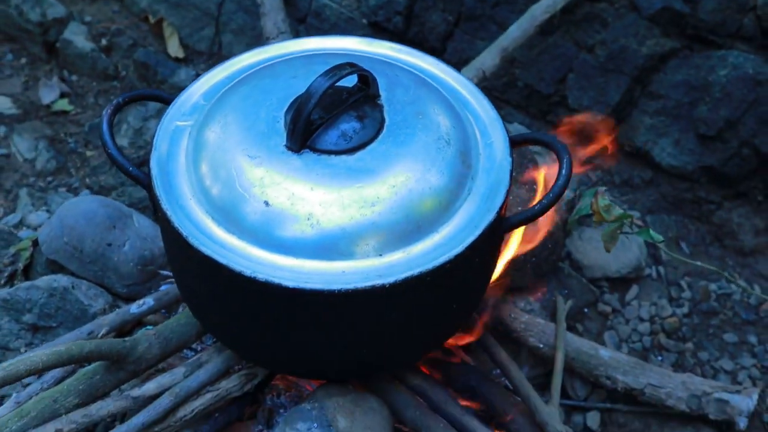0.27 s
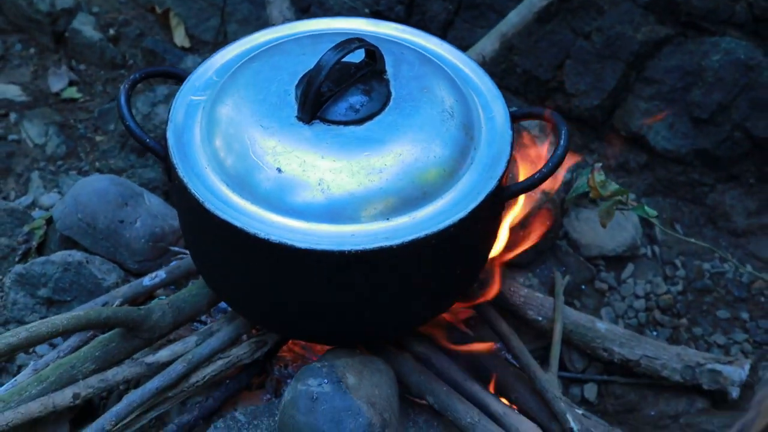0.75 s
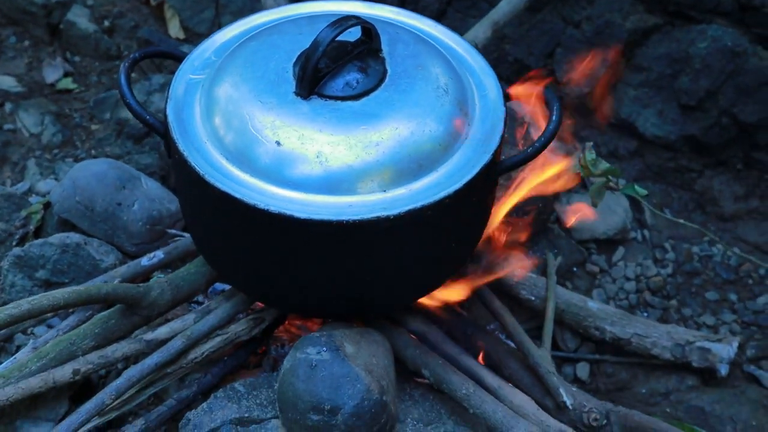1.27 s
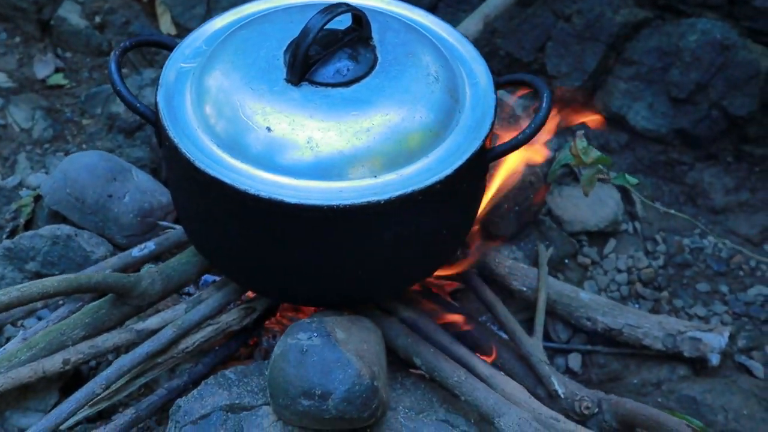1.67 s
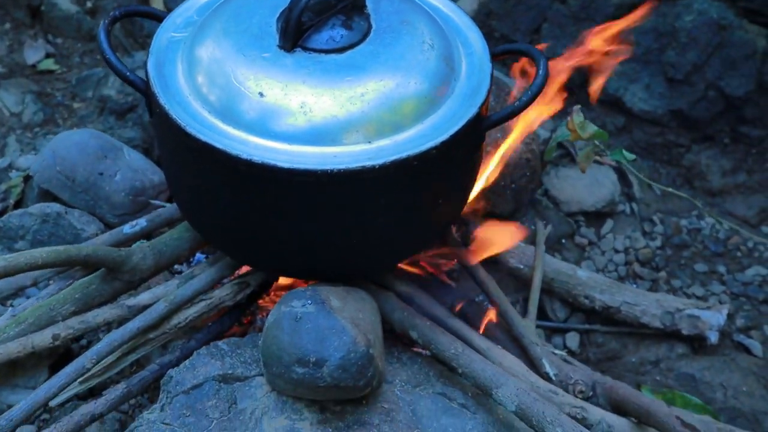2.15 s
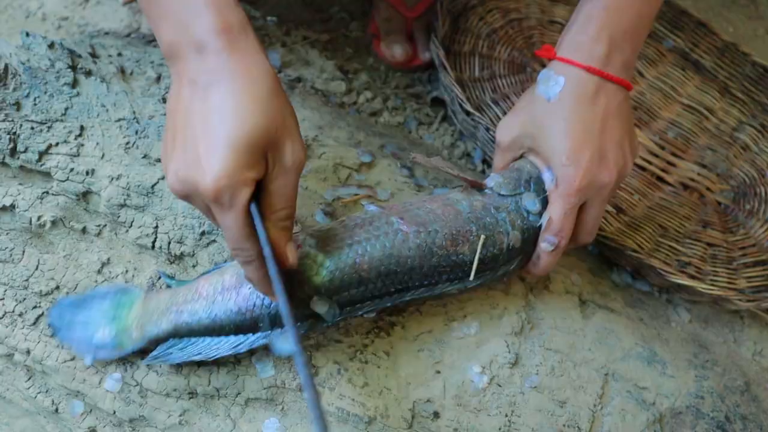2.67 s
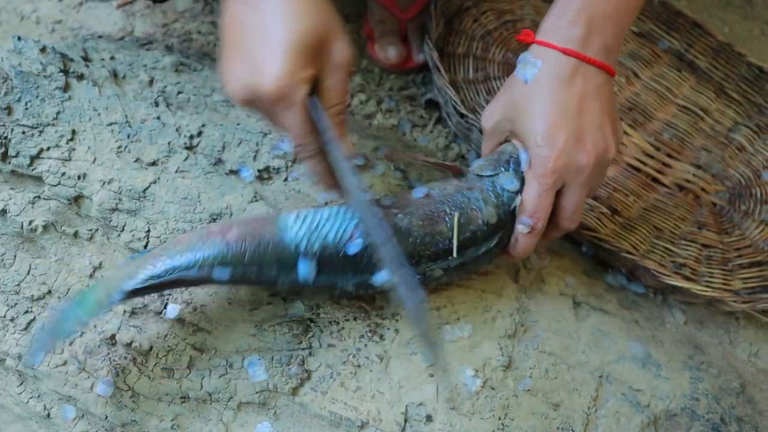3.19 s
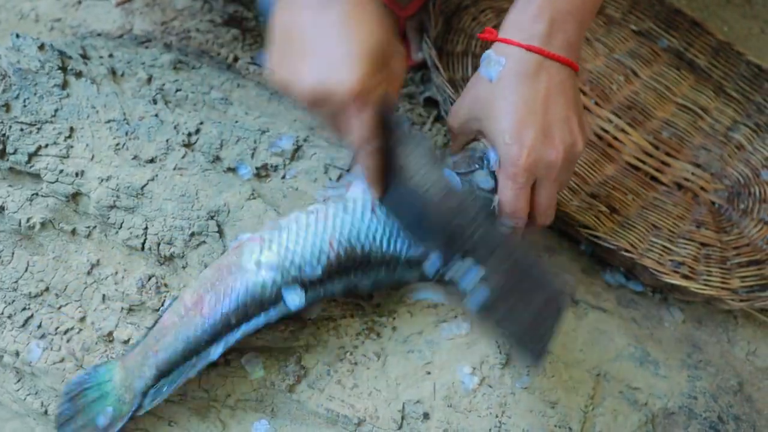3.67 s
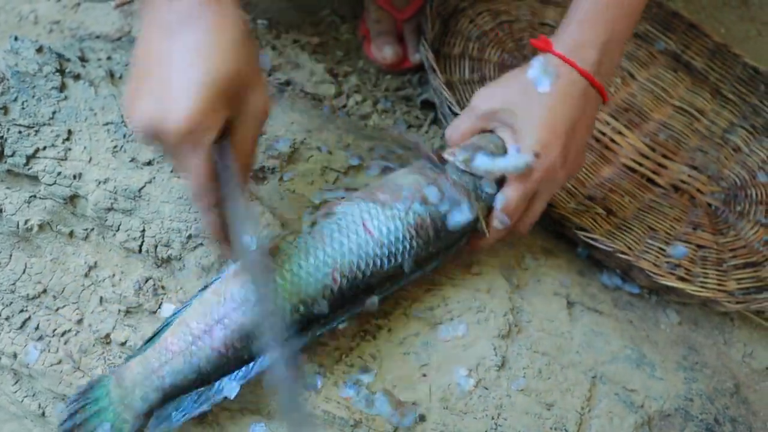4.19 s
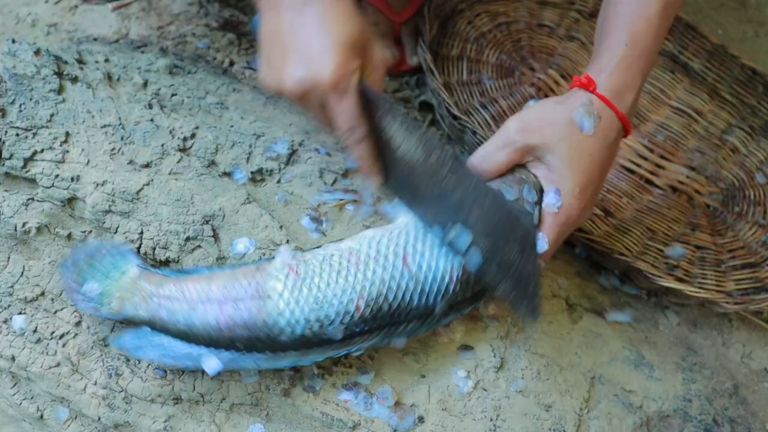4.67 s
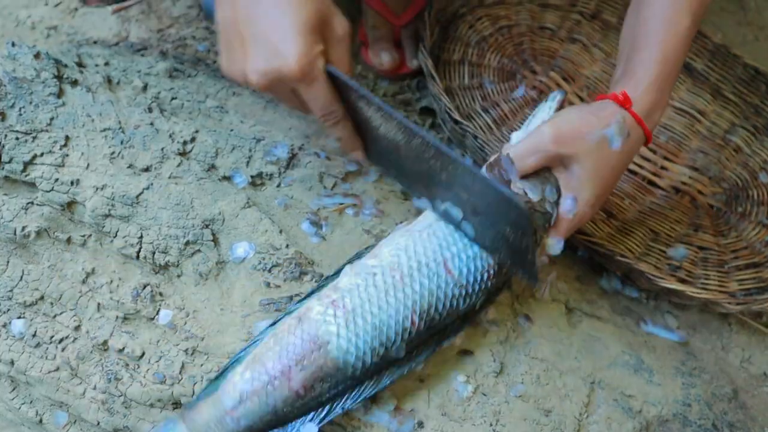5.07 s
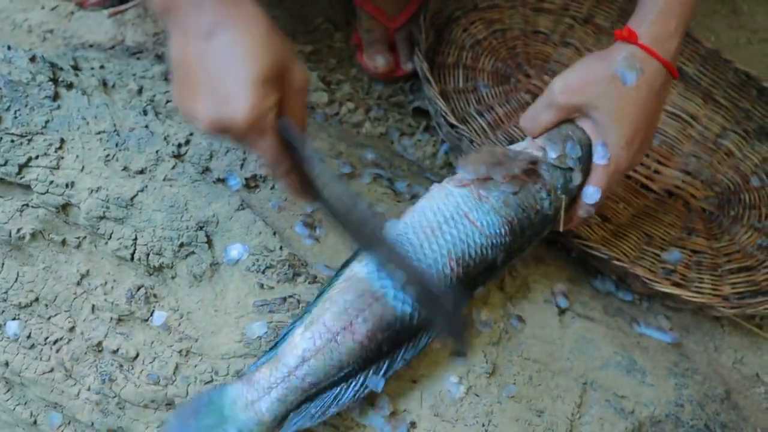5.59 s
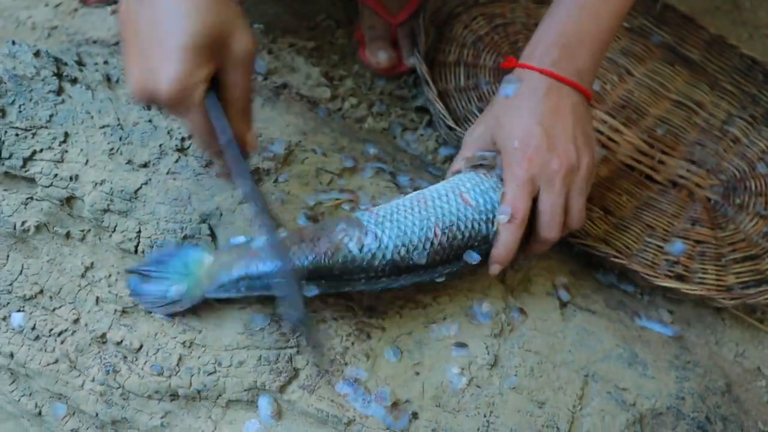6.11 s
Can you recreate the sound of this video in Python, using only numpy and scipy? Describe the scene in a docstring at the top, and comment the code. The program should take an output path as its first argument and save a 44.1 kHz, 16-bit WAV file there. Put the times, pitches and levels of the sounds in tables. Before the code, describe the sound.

First, flames flap and puff under a pot while wood hisses and crackles. After a hard cut and tiny gap, a cleaver scrapes a fish close to the microphone outdoors: short, bright, gritty rasps at an even pace, scales popping loose, wet skin brushing, the blade lightly pinging. The room-less sound is dry, with quiet air and, later, small distant trilling insect phrases.

```python
"""A wood fire flutters and hisses under a pot; after a short silence, a cleaver scales a fish on the ground outdoors.
The fire is coloured noise and grains with swelling levels, soft sinking thumps, and cracks and jets through resonances.
Each stroke is tearing grains, a drumming body, a skid and a trail; slides, snaps and strokes ring the steel's modes.
Behind, something small, probably an insect, chirps: a falling glide, then rising ticks, in a haze of band noise.
Two close microphone ports hear the fish with their own levels and phases, over quiet wavering air."""
import sys
import numpy as np
from scipy import signal
from scipy.fft import rfft, irfft, next_fast_len
from scipy.io import wavfile
from scipy.ndimage import uniform_filter1d, map_coordinates

SR = 44100
rng = np.random.default_rng(int(sys.argv[2]) if len(sys.argv) > 2 else 0)


def dump(signal):
    """Clip the signal to [-1, 1] and save it as 16-bit WAV at the path in sys.argv[1]."""
    limited = np.clip(np.atleast_2d(signal).T, -1, 1)
    pcm = np.round(limited * 32767).astype(np.int16)
    wavfile.write(sys.argv[1], SR, pcm)


N = 279594
T = np.arange(N) / SR

FIRE_END, FISH_START = 2.721, 2.759  # seconds
FLUTTER_S = .014  # spacing in time of the fire's changes of colour
TOUCH_S, LEAVE_S = 0.0035, 0.004  # time constants as a sliding contact sets in, and ends

# Width of the fire around the ports. Each row: frequency in Hz, side relative to middle in dB.
FIRE_WIDTH = [(60, -28), (110, -25), (200, -11), (380, -6.5), (700, -5.5), (1290, 1.5), (2380, 5.5),
              (4400, 7.5), (8120, 10), (15000, 3.5)]
# Strokes against the scales, each with one skid of the blade. Each row: start in seconds, length in seconds,
# bite time constant in seconds, relative tearing level in dB, fade over the stroke in dB, relative flesh level in dB,
# body resonance in Hz, skid start after the stroke's start in seconds, skid length in seconds,
# relative skid level in dB, squeak in Hz.
STROKES = [(2.836, 0.087, 0.0097, -15, 4, -31, 507, 0.06, 0.019, -15.5, 8100),
           (3.117, 0.1, 0.013, -24, -4.5, -33, 267, -0.0062, 0.039, -18, 6850),
           (3.424, 0.128, 0.01, -17.5, 7.5, -34.5, 264, -0.0053, 0.016, -13, 6250),
           (3.741, 0.083, 0.019, -23.5, -5, -36, 428, 0.057, 0.017, -20.5, 5100),
           (4.059, 0.099, 0.012, -23, -1, -34.5, 546, 0.054, 0.011, -43, 8900),
           (4.373, 0.13, 0.005, -21.5, 0, -35.5, 900, -0.00065, 0.011, -17, 7000),
           (4.717, 0.082, 0.0095, -21, 1, -35.5, 560, -0.024, 0.011, -25, 8760),
           (5.034, 0.084, 0.0024, -22.5, -1.5, -32.5, 230, 0.029, 0.01, -20, 7500),
           (5.333, 0.1, 0.01, -22, 6, -34, 520, 0.096, 0.014, -19, 4360),
           (5.668, 0.12, 0.0049, -25, 8.5, -34.5, 456, 0.017, 0.026, -13.5, 5200),
           (5.99, 0.09, 0.0083, -31.5, -2.5, -40.5, 510, 0.021, 0.03, -17, 9300)]
# Colour of tearing scales. Each row: frequency in Hz, relative level in dB.
TEAR = [(350, -19.5), (700, -15.5), (1300, -13), (2000, -4.5), (3000, -5), (4500, -3.5), (6500, -3.5),
        (8500, 1.5), (11000, 0.5), (12500, -12), (15500, -32)]


def undb(db):
    """Decibels to gain."""
    return 10 ** (np.asarray(db) / 20)


def unit(x):
    """Scale to rms 1."""
    return x / np.sqrt(np.mean(x ** 2))


def along(points, hz):
    """Read (Hz, value) points on a log-frequency axis."""
    f, value = np.transpose(points)
    return np.interp(np.log(hz + 1), np.log(f), value)


def over_time(points):
    """Read (seconds, value) points along the whole sound."""
    return np.interp(T, *np.transpose(points))


def convolve(x, response):
    """Pass sound through a response, keeping its length."""
    size = next_fast_len(N + response.shape[-1])
    return irfft(rfft(x, size) * rfft(response, size), size)[..., :N]


def colour(x, points, size=4096):
    """Causal minimum-phase filter with the given spectrum; white noise keeps its power."""
    hz = np.arange(size // 2 + 1) * SR / size
    cepstrum = irfft(np.log(undb(along(points, hz))))
    # folding the cepstrum makes the response causal
    cepstrum[1:size // 2] *= 2
    cepstrum[size // 2 + 1:] = 0
    response = irfft(np.exp(rfft(cepstrum)))
    return convolve(x, response / np.linalg.norm(response))


def resonance(x, hz, q):
    """One resonance; white noise keeps its power."""
    b, a = signal.iirpeak(min(hz, .45 * SR), max(q, 1), fs=SR)
    return signal.lfilter(b, a, x) / np.sqrt(b[0])


def add(track, s, sound):
    """Mix a short sound in at time s."""
    start = int(np.clip(s * SR, 0, N))
    track[start:start + len(sound)] += sound[:N - start]


def walk(rate):
    """Smooth random wandering, rms 1, with about this many new values per second."""
    k = max(int(SR / rate), 1)
    steps = np.repeat(rng.standard_normal(N // k + 1), k)[:N]
    return unit(uniform_filter1d(steps, k))


def grains(rate, spread_db):
    """Random tiny impulses of unequal size, rms 1; rate is the mean count per second."""
    size = undb(spread_db * np.clip(rng.standard_normal(N), -2, 2))
    happens = rng.random(N) < rate / SR
    return unit(happens * size * rng.choice([-1, 1], N))


def burst(decay_s, size=1024):
    """A crack of noise that dies at once, peak 1."""
    x = rng.standard_normal(size) * np.exp(-T[:size] / decay_s)
    return x / np.abs(x).max()


def swell(t, rise_s, fall_s):
    """Grows exponentially to 1 at t = 0, then dies away."""
    return np.exp(np.minimum(t / rise_s, -t / fall_s))


def contact(t, length, rise_s, release_s):
    """Pressure t seconds after touching: it bites, holds and lets go."""
    bite = 1 + np.tanh(t / rise_s)
    release = 1 - np.tanh((t - length) / release_s)
    return bite * release / 4


def flicker(x, every_s, octaves, depth_db, size=512):
    """Neighbouring registers swell and sink on their own; the gain has rms 1."""
    hz, s, cells = signal.stft(x, SR, nperseg=size)
    place = np.meshgrid(np.log2(1 + hz / 100) / octaves, s / every_s, indexing="ij")
    chance = map_coordinates(rng.standard_normal((32, 1024)), place, order=1, mode="mirror")
    gain = unit(undb(depth_db * chance))
    return signal.istft(cells * gain, SR, nperseg=size)[1][:N]


def thumps(rows, cycles, sag, size=6000):
    """Soft low blows that swell, sink in pitch and die within a few cycles."""
    out = np.zeros(N)
    for s, db, hz in rows:
        age = T[:size] * hz / cycles
        sinking_hz = hz * (1 - sag * np.tanh(age / 2))
        tone = np.sin(2 * np.pi * np.cumsum(sinking_hz) / SR)
        add(out, s, undb(db) * age * np.exp(1 - age) * tone)
    return out


def spread(mid, side, width):
    """A wide source: each port hears the middle plus or minus a side signal weighted by frequency."""
    hz = np.arange(N // 2 + 1) * SR / N
    side = irfft(rfft(side) * undb(along(width, hz)), N)
    return np.array([mid + side, mid - side])


def surroundings(x, t60, wet_db, size=9000):
    """Short scatter off ground and nearby things, different in each ear."""
    envelope = undb(-60 * T[:size] / t60) * (1 - np.exp(-T[:size] / 0.0053))
    tail = rng.standard_normal((2, size)) * envelope
    return undb(wet_db) * convolve(x, tail / np.linalg.norm(tail[0]))


def moving(x, response, hop=2048):
    """The knife keeps moving, so each short overlapping stretch of sound meets a fresh response."""
    out, fade = np.zeros((2, N)), signal.get_window("hann", 2 * hop)
    x = np.pad(x, (0, 2 * hop))
    for first in range(int(FISH_START * SR) - hop, N, hop):
        stretch = x[first:first + 2 * hop] * fade
        for track, ear in zip(out, response()):
            add(track, first / SR, signal.fftconvolve(stretch, ear))
    return out


def flames():
    """Flames flutter as noise and grains, flaring with a soft thump as each pocket of gas catches light."""
    # Each row: frequency in Hz, relative level in dB.
    flame_colour = [(15, -58), (25, -10.5), (86, 1), (184, 0), (357, -10), (460, -4), (779, -11.5),
                    (894, -11.5), (1480, -18), (3230, -29.5), (4160, -39.5), (6000, -29.5), (7800, -34.5),
                    (13200, -120)]
    # Strength of the flames. Each row: time in seconds, relative level in dB.
    blaze = [(0.0, -42), (0.19, -40.5), (0.25, -36), (0.59, -39.5), (0.61, -37), (0.8, -44.5), (0.92, -38),
             (1.47, -41.5), (1.55, -42.5), (1.63, -33.5), (1.68, -39), (2.7, -39.5)]
    # Pockets of gas catching light. Each row: start in seconds, peak level in dB, starting pitch in Hz.
    puffs = [(.112, -30, 170), (.265, -22.5, 255), (.33, -33, 190), (.46, -30, 200), (0.61, -26, 176),
             (0.899, -25.5, 327), (1.045, -28, 155), (1.17, -26, 278), (1.625, -25, 433), (1.665, -31, 300),
             (1.94, -23, 173), (2.009, -24.5, 314), (2.075, -27.5, 300), (2.174, -29, 260),
             (2.256, -25.5, 412), (2.41, -23.5, 480), (2.451, -26.5, 156), (2.517, -27.5, 127)]
    flutter = []
    for _ in range(2):
        roar = grains(260, 2.8) + 1.06 * rng.standard_normal(N)
        flutter.append(colour(flicker(roar, FLUTTER_S, .8, 3.5), flame_colour))
    # flares relative to their puffs, flutter relative to the blaze
    flares = sum(undb(db - 19.5) * swell(T - s, 0.0042, 0.016) for s, db, _ in puffs)
    steady = undb(over_time(blaze) - 4) * unit(undb(2 * walk(60)))
    return spread(*flutter, FIRE_WIDTH) * np.hypot(steady, flares) + thumps(puffs, 0.24, 0.12)


def hiss():
    """Gas hisses steadily from the wood as noise and grains, and surges and sinks back."""
    # Each row: frequency in Hz, relative level in dB.
    hiss_colour = [(400, -21.5), (700, 0.5), (1100, -2), (1700, -0.5), (2500, -3.5), (4000, -6),
                   (6300, -13.5), (10500, -11), (12500, -19.5), (15000, -38)]
    # Each row: peak in seconds, rise and fall time constants in seconds, relative level in dB.
    surge_rows = [(.01, 0.057, 0.13, -41.5), (.57, 0.026, 0.026, -43), (.69, 0.012, 0.24, -46),
                  (.74, 0.038, .035, -44.5), (1.08, 0.07, 0.14, -46), (1.644, 0.011, 0.067, -34.5),
                  (1.79, 0.034, 0.027, -50), (1.866, 0.015, 0.04, -39), (1.912, 0.011, 0.0067, -39.5),
                  (2.08, 0.024, 0.043, -57), (2.676, 0.091, 0.037, -33)]
    gas = []
    for _ in range(2):
        breath = rng.standard_normal(N) + 0.24 * grains(500, 1.4)
        gas.append(colour(flicker(breath, FLUTTER_S, 0.516, 1.5), hiss_colour))
    surges = sum(undb(db) * swell(T - s, rise_s, fall_s) for s, rise_s, fall_s, db in surge_rows)
    steady = undb(-50.5 + .6 * walk(5.15))
    return spread(*gas, FIRE_WIDTH) * np.hypot(steady, surges) * undb(0.86 * walk(90))


def wood(size=16384):
    """Wood cracks as resonant bursts, gas spurts as resonant noise, and embers split in tiny grains."""
    # Wood cracks. Each row: start in seconds, relative level in dB, pitch in Hz.
    crack_rows = [(0.431, -29.5, 2620), (0.5338, -26, 2400), (0.674, -26, 8000), (0.8124, -25.5, 5760),
                  (1.0637, -33, 9000), (1.085, -24, 3670), (1.091, -28, 7000), (1.128, -27, 1700),
                  (1.228, -34, 7550), (1.2393, -30.5, 2600), (1.5997, -33, 3000), (1.8514, -31, 4200),
                  (2.48, -31, 3000), (2.557, -26, 3000), (2.583, -30, 4000), (2.66, -20, 3500)]
    # Short breathy jets of escaping gas. Each row: middle in seconds, length in seconds, pitch in Hz,
    # relative level in dB.
    jets = [(.47, 0.18, 990, -60), (0.558, 0.075, 1270, -47.5), (0.704, 0.11, 1850, -52),
            (1.218, 0.018, 2400, -44), (1.794, 0.017, 1700, -42.5), (2.623, 0.009, 1250, -31.5)]
    out = undb(-60) * grains(160, 4.6)  # embers
    t = T[:size] - T[size // 2]
    for s, db, hz in crack_rows:
        split = burst(0.0006)
        add(out, s, undb(db + 2.5) * (0.67 * split + resonance(split, hz, 1.8)))
    for s, length, hz, db in jets:
        breath = resonance(rng.standard_normal(size), hz, 3.5)
        add(out, s + t[0], undb(db) * contact(t + length / 2, length, .002, .004) * breath)
    out = colour(out, [(100, 8.0), (9000, -6.5), (11000, -0.5), (14000, -34)])
    return undb(-8.0) * out + surroundings(out, 0.0073, 1.5)


def fire():
    """Flames, hissing gas and cracking wood sound together."""
    return flames() + hiss() + wood()


def air():
    """Quiet, slowly wavering outdoor background of coloured noise."""
    # Each row: frequency in Hz, relative level in dB.
    air_colour = [(15, -25), (30, -14), (70, -5.5), (250, -6.5), (420, -10.5), (1000, -12), (1700, -13),
                  (2400, -10.5), (3500, -13), (4800, -19), (6500, -20), (10900, -22), (13000, -36),
                  (15000, -55)]
    # Each row: frequency in Hz, side relative to middle in dB.
    air_width = [(60, -18), (200, -5), (700, -1.5), (2400, 1.5), (4400, 7), (15000, 5)]
    noise = colour(rng.standard_normal((2, N)), air_colour)
    return undb(-49.5 + 2 * walk(5.4)) * spread(*noise, air_width)


def slides(size=12000):
    """Gritty friction of steel on wet skin: faint brushing, a skid and a trail per stroke, and slides back."""
    # Between strokes the blade slides back over the wet skin, or touches down. Each row: middle in seconds,
    # length in seconds, relative level in dB, squeak in Hz, squeak strength as a gain, squeak Q.
    slide_rows = [(2.776, 0.027, -22.5, 3100, 0.45, 85), (2.934, 0.016, -29, 4500, 0.67, 2),
                  (3.021, 0.045, -22.5, 6140, 0.22, 20), (3.07, 0.013, -33, 6120, 0.33, 20),
                  (3.305, 0.028, -35, 6020, 0.41, 20), (3.385, 0.0036, -18.5, 2760, 1, 2.4),
                  (3.583, 0.017, -37, 5000, 0.62, 2), (3.607, .016, -29, 9500, 0.46, 2.5),
                  (3.629, 0.015, -17.5, 3060, 1, 2.1), (3.641, 0.015, -26, 6000, .3, 2),
                  (3.697, 0.029, -38, 7500, 0.45, 4.3), (3.892, 0.031, -35.5, 7000, .3, 2),
                  (3.92, 0.01, -26.5, 9900, 0.73, 2.2), (4.22, 0.029, -35, 6500, .2, 4),
                  (4.84, .012, -34, 9000, .3, 3), (4.873, 0.0058, -34.5, 6760, 0.62, 6.4),
                  (5.671, 0.0074, -19, 10200, 0.28, 4), (5.939, 0.024, -30.5, 6100, 0.31, 50),
                  (6.055, .016, -31, 3200, 0.87, 3), (6.117, 0.039, -30, 5230, 0.34, 19),
                  (6.315, 0.0065, -14.5, 5470, 0.28, 12), (6.34, 0.0071, -11, 8400, 0.28, 5)]
    # Each row: frequency in Hz, relative level in dB.
    rasp_colour = [(300, -21), (550, -17), (1300, -20), (2000, -8.5), (2800, -9), (3700, -6.5),
                   (5500, -2.5), (7000, -1), (9000, 2), (11000, 2.5), (12500, -9), (15500, -28)]
    grit_share = .55  # of the friction's power
    t = T[:size] - T[size // 2]
    # loose scales brush the blade, less as the skin is cleared
    brush_db = -44 - 17.5 * np.maximum(T - FISH_START, 0) + 9.5 * walk(40)
    out = rng.standard_normal(N) * undb(brush_db)
    grit = np.sqrt(1 - grit_share) * rng.standard_normal(N) + np.sqrt(grit_share) * grains(6000, 3.5)

    def skim(length, db, squeak_hz, squeak=0.58, q=4):
        """One sliding contact, squeaking at its own pitch."""
        friction = np.roll(grit, rng.integers(N))[:size]
        rasp = 1.054 * friction + squeak * resonance(rng.standard_normal(size), squeak_hz, q)
        return undb(db) * contact(t + length / 2, length, TOUCH_S, LEAVE_S) * rasp

    for start, length, *_, skid_after, skid_length, skid_db, squeak_hz in STROKES:
        add(out, start + skid_after + skid_length / 2 + t[0], skim(skid_length, skid_db, squeak_hz))
        trail = undb(-42) * swell(t, TOUCH_S, 0.053) * rng.standard_normal(size)
        add(out, start + length + t[0], trail)
    for s, *slide in slide_rows:
        add(out, s + t[0], skim(*slide))
    return colour(out * undb(0.56 * walk(350)), rasp_colour)


def pushes(size=12000):
    """Scales tear under the edge, ticking at several pitches, and their tugs drum the soft body."""
    # The fish drags on the ground as it is shifted. Each row: middle in seconds, length in seconds,
    # relative level in dB.
    drags = [(2.788, 0.074, -43), (3.021, 0.15, -47), (6.122, 0.023, -47)]
    # Each row: frequency in Hz, relative level in dB.
    flesh_colour = [(60, -16), (130, -11.5), (220, 1.5), (330, -1), (500, 0.5), (750, -4), (1100, -8),
                    (1600, -22), (3000, -21)]
    tear, flesh = np.zeros((2, N))
    rows = unit(undb(2.3 * walk(400)))  # uneven strength of the rows of scales
    ticks = unit(sum(resonance(grains(49, 3), hz, 4) for hz in np.geomspace(1600, 11000, 9)))
    ripping = rows * (.8 * grains(1500, 5.5) + .4 * rng.standard_normal(N) + 0.34 * ticks)
    ripping = flicker(ripping, .01, .6, 2.5, size=256)
    tugs = rows * grains(600, 4.4)
    drumming = colour(tugs, flesh_colour)
    t = T[:size] - T[size // 4]
    for start, length, bite_s, db, fade_db, flesh_db, body_hz, *_ in STROKES:
        first = int((start + t[0]) * SR)
        now = np.arange(first, first + size) % N
        press = contact(t, length, bite_s, .007)
        way = np.clip(t / length, 0, 1)
        body = .8 * drumming[now] + .42 * resonance(tugs[now], body_hz, 3.5)
        # the body is pressed hardest before mid-stroke
        arch_db = flesh_db - 24 * (way - 0.28) ** 2
        add(tear, start + t[0], press * undb(db - fade_db * way) * ripping[now])
        add(flesh, start + t[0], press * undb(arch_db) * body)
    dragging = sum(undb(db) * contact(T - s + length / 2, length, TOUCH_S, LEAVE_S) for s, length, db in drags)
    return colour(tear, TEAR), flesh + dragging * drumming


def blade(x, size=8000):
    """The steel's ringing modes; the point of contact decides how strongly each one answers."""
    # Cleaver modes. Each row: nominal pitch in Hz, relative level in dB,
    # 60 dB decay in seconds before the grip's damping.
    mode_rows = [(2015, 3, 0.15), (2140, -3.5, 0.2), (2640, 6.5, 0.082), (3584, 8, 0.052), (3840, 5, 0.12),
                 (4780, -4.5, 0.026), (5160, 0.5, 0.12), (5635, 6, 0.035), (6090, -1.5, 0.11),
                 (6810, -6.5, 0.035), (7330, -4, 0.05), (8850, 2, 0.046), (8950, 1, 0.011),
                 (9410, -4, 0.033)]
    grip_detune, grip_damp_s = 0.0057, 0.14  # typical pitch shift as a share; extra decay time constant
    t = T[:size]
    hz = np.array(mode_rows)[:, :1]
    decays = np.array([undb(db - 60 * t / t60) / np.sqrt(t60) for _, db, t60 in mode_rows])
    decays *= np.exp(-t / grip_damp_s)
    decays *= np.sqrt(2) / np.linalg.norm(decays)

    def touch():
        """Each mode is slightly detuned, with its own strength, and reaches each port at its own phase."""
        modes = decays * np.exp(2j * np.pi * t * hz * (1 + grip_detune * rng.standard_normal(hz.shape)))
        strength = undb(1.5 * rng.standard_normal(len(mode_rows)))
        phase = np.exp(2j * np.pi * rng.random((2, len(mode_rows))))
        return (strength * phase @ modes).imag

    return moving(x, touch)


def snaps():
    """A stiff scale lets go with one sharp spike, a brief ping and a duller knock."""
    # The stiffest scales snap free. Each row: start in seconds, relative level in dB,
    # knock relative to that in dB (both before colouring), pitch in Hz.
    snap_rows = [(2.8585, -1, -22, 4000), (2.8794, -3, -22, 8900), (2.96, -3, -17.5, 1820),
                 (3.136, -3, -30, 7000), (3.1446, -3.5, -29, 7050), (3.1657, -5, -19, 5000),
                 (3.171, -2, -24, 3800), (3.1874, -1.5, -24, 4530), (3.2212, -3.5, -7, 10800),
                 (3.4387, -4.5, -14, 6000), (3.4757, 3, -14, 6060), (3.4818, 0.5, -19, 7950),
                 (3.5015, -1, -28, 6500), (3.5363, -12.5, 3.5, 3000), (3.6208, -11, -22, 2700),
                 (3.6325, -1, -35, 3000), (3.653, -11, -29, 8500), (3.765, 3.5, -12.5, 6800),
                 (3.805, -4.5, -26, 7000), (3.813, -3, -35, 7000), (3.8198, -5, -26, 4480),
                 (3.8367, -2.5, -21, 3560), (4.133, -2.5, -27, 8890), (4.1355, -3, -13, 8890),
                 (4.178, -11.5, -14.5, 2200), (4.4365, -14, -25, 6000), (4.443, -2.5, -25, 8760),
                 (4.469, -6, -23, 5700), (4.4748, -4, -16, 5000), (4.4928, -1, -28, 8350),
                 (4.498, 0.5, -13.5, 4600), (4.555, -27, 2, 1800), (4.7245, -5, -31, 8500),
                 (4.741, -11, -24, 4500), (4.7461, -5.5, -17, 5500), (4.78, 1, -9.5, 10500),
                 (4.797, -8.5, -17, 6000), (4.807, -5, -23, 7500), (4.8304, -11.5, -12, 3200),
                 (5.068, -1.5, -26, 8000), (5.0765, -3, -26, 7000), (5.0902, -9, -23, 9000),
                 (5.0968, -6, -10, 4000), (5.1207, -10, -19, 10500), (5.1318, -4.5, -20, 10500),
                 (5.219, -16.5, -6.5, 3360), (5.3438, -11, -24, 6000), (5.357, 0.5, -30, 5170),
                 (5.3587, 4.5, -26, 6940), (5.393, -5, -22, 9000), (5.3994, 0, -30, 5710),
                 (5.44, -6, -29, 4400), (5.5151, -8.5, -12.5, 3200)]
    # Each row: frequency in Hz, relative level in dB.
    knock_colour = [(40, -25), (110, -2.5), (400, -6.5), (1700, -2.5), (3000, -4), (7000, -45)]
    crack, knock = np.zeros((2, N))
    for s, db, knock_db, hz in snap_rows:
        flick = .4 * burst(.0005) + signal.unit_impulse(1024)
        add(crack, s, undb(db) * (flick + 0.48 * resonance(flick, hz, 3.1)))
        add(knock, s, undb(db + knock_db) * burst(0.0028))
    return undb(1) * colour(crack, TEAR) + undb(-4.5) * colour(knock, knock_colour)


def rings(size=12000):
    """The edge sets a bending mode singing: a thin tone of the blade that lasts while the edge rubs."""
    # Each row: middle in seconds, length in seconds, pitch in Hz, relative level in dB.
    ring_rows = [(2.9, .03, 2150, -41), (3.128, 0.03, 2000, -34.5), (3.168, 0.041, 2120, -28.5),
                 (5.725, 0.032, 5350, -33), (5.758, .025, 2113, -28.5), (5.875, 0.06, 2110, -56),
                 (5.945, 0.024, 6050, -39), (5.955, 0.05, 2130, -39.5), (6.326, 0.012, 2130, -33)]
    out, t = np.zeros(N), T[:size] - T[size // 2]
    for s, length, hz, db in ring_rows:
        rub = contact(t + length / 2, length, 0.0082, 0.01)
        add(out, s + t[0], undb(db) * rub * np.sin(2 * np.pi * hz * t))
    return out


def slaps():
    """The fish's body slaps softly: low tones that swell and sink."""
    # Each row: start in seconds, relative level in dB, starting pitch in Hz.
    slap_rows = [(2.89, -30, 285), (3.156, -22, 574), (3.172, -26, 302), (3.443, -31.5, 243),
                 (3.838, -45, 236), (4.265, -34, 273), (5.055, -39.5, 201)]
    return thumps(slap_rows, 2.1, .33)


def ground(x, size=512):
    """First reflections off the ground, hands and basket, within a few milliseconds."""
    shape = np.exp(-T[:size] / 0.0033) * (1 - np.exp(-T[:size] / 0.000083))
    return moving(x, lambda: rng.standard_normal((2, size)) * shape / np.linalg.norm(shape))


def scaling():
    """Rubbing, tearing and snapping ring the blade; the ports differ in level and phase by frequency."""
    # How freely the steel rings; the thick of the fish damps it. Each row: time in seconds, gain in dB.
    freedom = [(2.76, 0), (3.3, -2), (3.38, -7), (5.4, -5), (5.67, 0), (6.3, -1)]
    # Small things scatter little bass. Each row: frequency in Hz, relative level in dB.
    scatter_colour = [(150, -9), (400, -6), (1000, 0), (15000, 0)]
    # Each row: frequency in Hz, left minus right in dB.
    port_db = [(200, -1), (500, 1), (1100, -2.5), (2200, -4.5), (3200, -2.5), (4500, 4.5), (8000, 4.5),
               (13000, -2.5)]
    # Each row: frequency in Hz, radians by which left leads.
    port_phase = [(200, 0), (500, .05), (1000, 0.18), (2100, 0.41), (3400, 1.0), (5700, 0.76), (7200, -1.7),
                  (8800, -2.2), (12000, -2.06)]
    tear, flesh = pushes()
    rasp, snap = slides(), snaps()
    # on light slides the steel rings; pressed into the flesh it is damped
    strike = undb(-7) * rasp + undb(-10.5) * (tear + snap)
    steel = blade(undb(over_time(freedom)) * strike)
    near = tear + flesh + undb(-1.5) * rasp + snap + slaps() + rings()
    scatter = undb(-3.5) * ground(colour(near, scatter_colour))
    hz = np.arange(N // 2 + 1) * SR / N
    ears = np.array([[.5], [-.5]])  # left, right
    direct = rfft(near) * np.exp(1j * ears * along(port_phase, hz))
    heard = irfft((direct + rfft(steel + scatter)) * undb(ears * along(port_db, hz)), N)
    return undb(-1.5) * heard + surroundings(near, 0.12, -24.0)


def chirps(count=12):
    """Phrases of one falling slur, then hoarse rising ticks, blurred by echoes in a haze of far chirping."""
    # Each row: start in seconds, relative level in dB, middle of the first tick after the start in seconds,
    # tick sweep in octaves.
    phrases = [(3.749, -38, .035, 1.2), (4.285, -36.5, .055, .9), (4.821, -40, .049, .8),
               (5.366, -40.5, .029, 1), (5.907, -38, .058, 1.2)]
    # Far chirping merged into a band. Each row: frequency in Hz, relative level in dB.
    haze_colour = [(1800, -44), (2500, -2), (3000, -12), (3600, 4), (4200, -5), (4900, -45)]
    tick_s, tick_hz, tick_every_s = .024, 3400, .0357  # length, nominal middle pitch, mean spacing
    out = np.zeros(N)

    def note(length, from_hz, to_hz, hoarse, sharpness, bend=1):
        """One glide, loudest in its middle, its phase wandering by hoarse radians per sample."""
        way = np.linspace(0, 1, int(length * SR))
        glide = from_hz * (to_hz / from_hz) ** (1 - (1 - way) ** bend)
        hz = glide * (1 + 0.025 * rng.standard_normal())
        wobble = hoarse * np.cumsum(rng.standard_normal(4096))[:len(way)]
        return np.sin(np.pi * way) ** sharpness * np.sin(2 * np.pi * np.cumsum(hz) / SR + wobble)

    for s, db, after, octaves in phrases:
        # the slur drops fast, then levels out
        add(out, s - .005, undb(db + 1.5) * note(.04, 4500, 2980, .07, 1, bend=2.5))
        sweep = 2 ** (octaves / 2)
        for k in range(count):
            late, louder = rng.standard_normal(2)
            tick = note(tick_s, tick_hz / sweep, tick_hz * sweep, .16, 4)
            start = s + after - tick_s / 2 + k * tick_every_s + .001 * late
            add(out, start, undb(db + .3 + 1.5 * louder) * tick)
    entry = np.clip((T - 3.75) / .1, 0, 1)
    haze = undb(-55.5 + 1.5 * walk(30)) * colour(rng.standard_normal((2, N)), haze_colour) * entry
    return .7 * out + surroundings(out, .15, -4) + haze


def scene():
    """First the fire, a moment of silence, then the fish."""
    fish = scaling() + chirps() + air()
    return fire() * (T < FIRE_END) + fish * (T > FISH_START)


def record(dry):
    """The recorder clips at full scale and cuts the top above 15600 Hz."""
    top_cut = signal.ellip(8, .2, 70, 15600, fs=SR, output="sos")
    return signal.sosfilt(top_cut, np.clip(dry, -1, 1))


dry = scene()
out = record(dry)
dump(out)
```